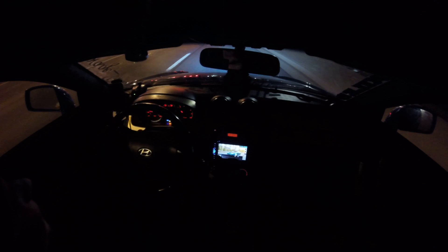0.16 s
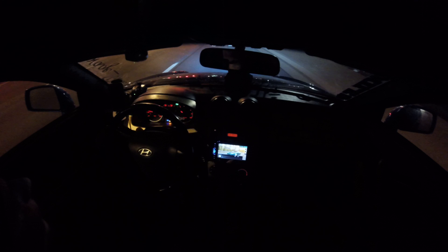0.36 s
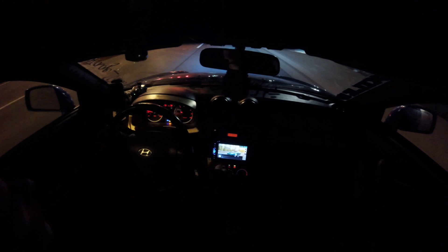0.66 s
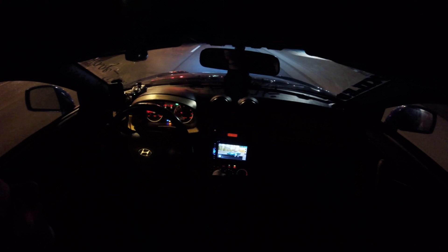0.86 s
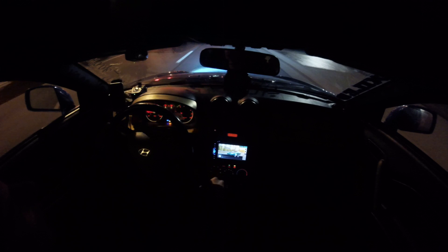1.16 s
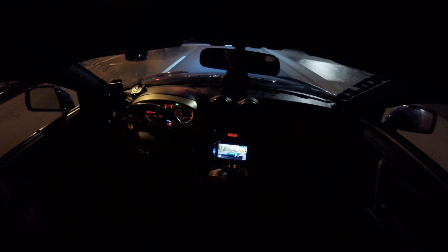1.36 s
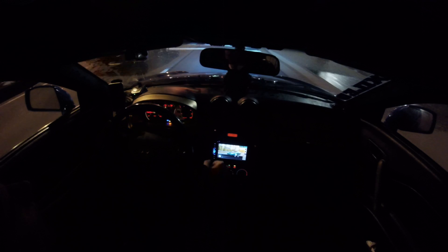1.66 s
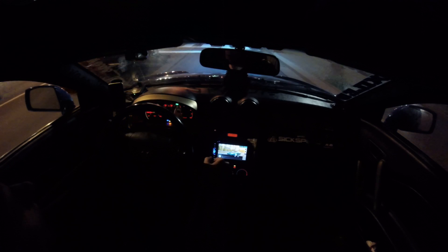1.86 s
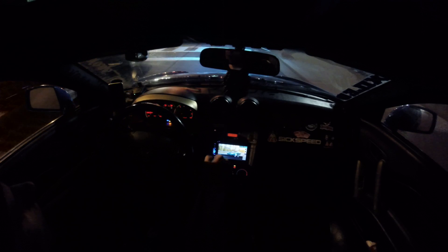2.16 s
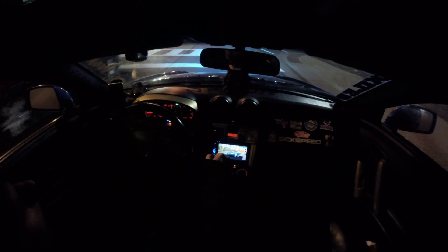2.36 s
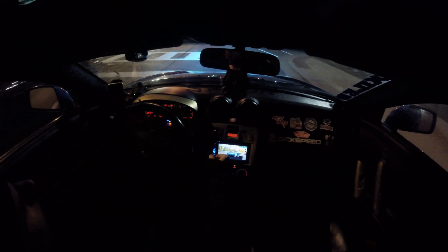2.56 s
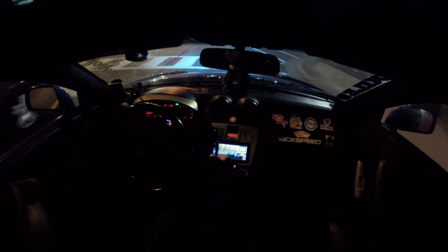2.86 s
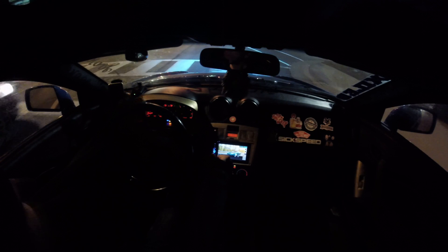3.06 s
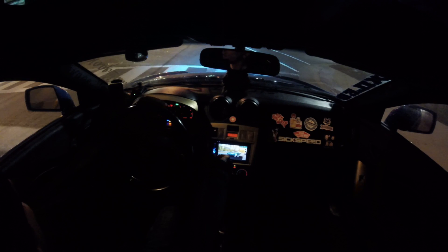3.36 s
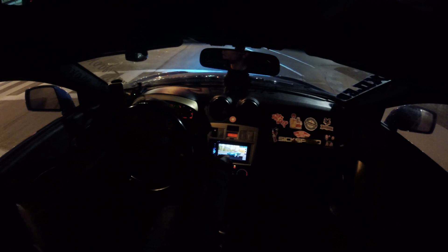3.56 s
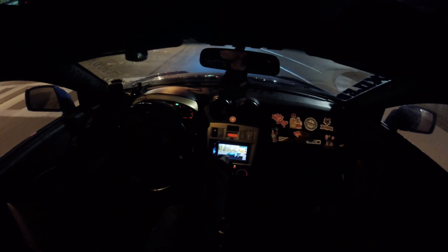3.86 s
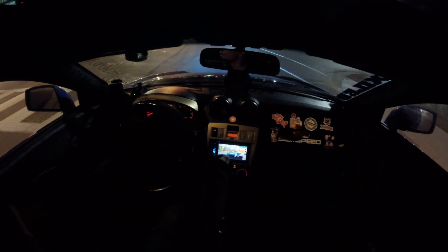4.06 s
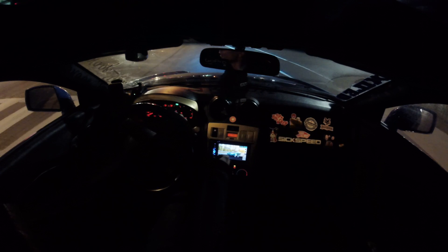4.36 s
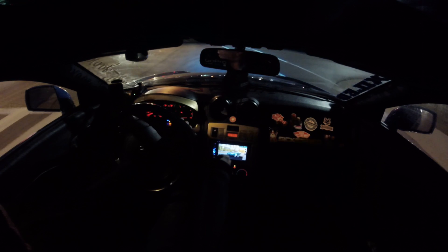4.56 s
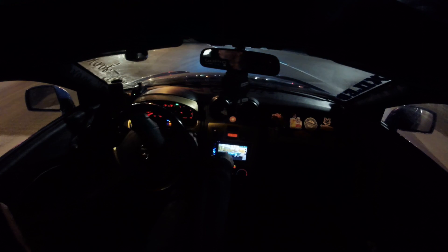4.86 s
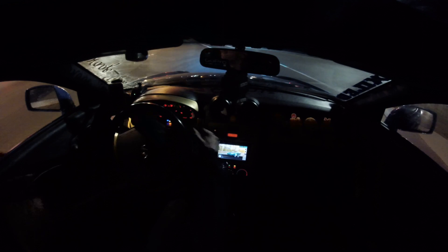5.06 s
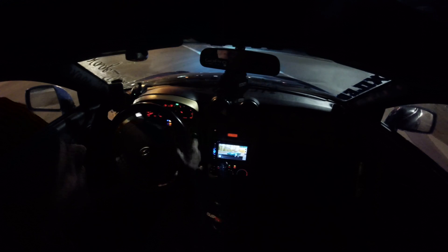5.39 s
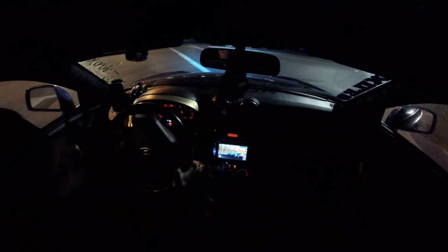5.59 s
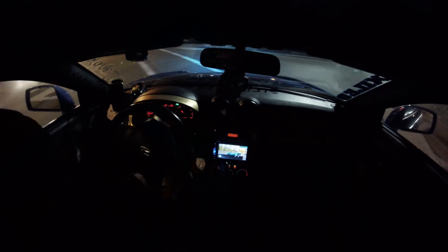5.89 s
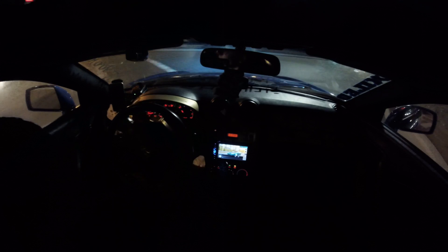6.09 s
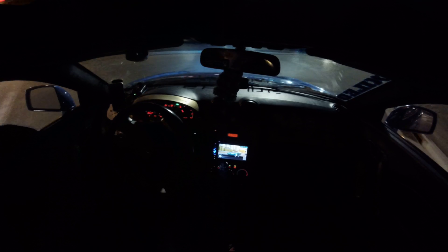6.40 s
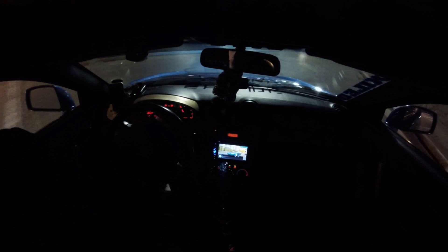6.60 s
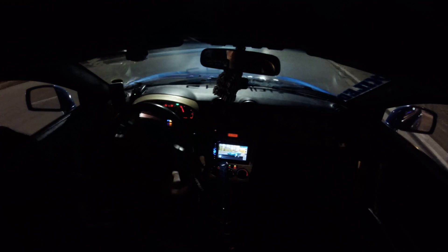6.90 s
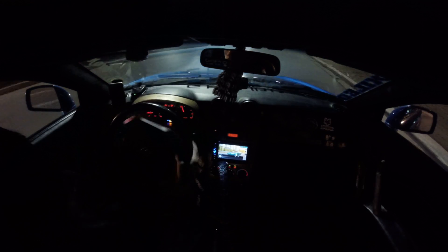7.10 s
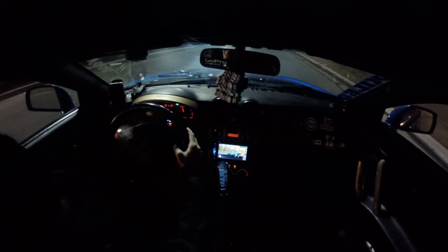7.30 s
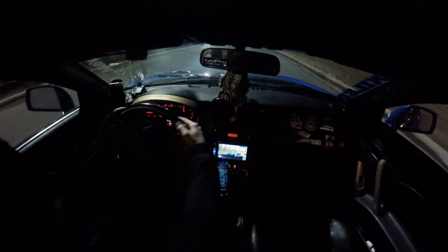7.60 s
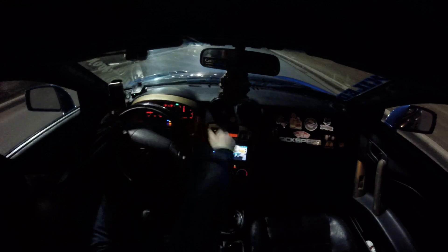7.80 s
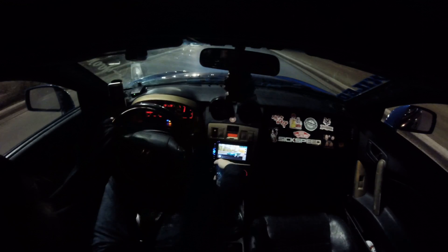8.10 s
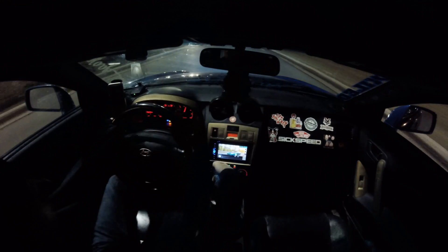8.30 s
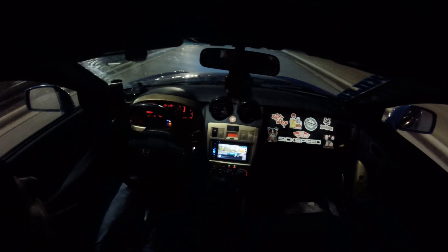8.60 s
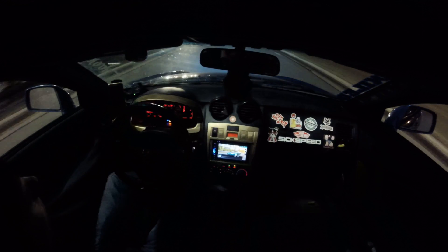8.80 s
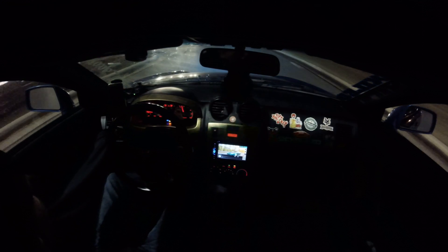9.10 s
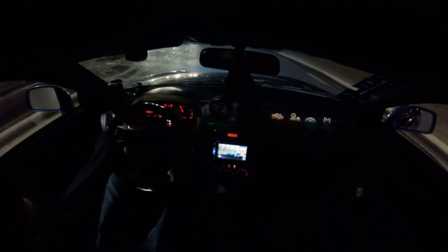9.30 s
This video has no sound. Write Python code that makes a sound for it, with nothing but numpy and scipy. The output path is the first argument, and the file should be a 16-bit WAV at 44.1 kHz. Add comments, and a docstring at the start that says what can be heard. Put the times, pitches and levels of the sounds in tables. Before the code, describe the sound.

Cabin microphone, close and boomy: open exhaust note sinks as the car slows for a turn, popping and grumbling into an uneven idle while an indicator clicks. After about four seconds a rough throttle blip breaks in, then a long rising pull swells into a hard raspy blare. It drops for a gear change and surges again, over road rumble, small rattles and growing air hiss.

```python
"""A four-cylinder engine with an open exhaust burbles down to idle, heard from the cabin on a night road.
An indicator ticks for the turn; the engine is blipped into gear, pulls hard, lifts for a shift, pulls again.
Harmonics of the firing rate make its boom and rasp; ringing firings make the burble, damped sines the pops.
Filtered noise makes gas rush, body rumble, tyres and wind; enveloped resonances make trim knocks and clinks.
Short scrapes and faint gliding tones come and go."""
import sys
import numpy as np
from scipy import signal
from scipy.fft import rfft, irfft, next_fast_len
from scipy.io import wavfile

SR = 44100
rng = np.random.default_rng(int(sys.argv[2]) if len(sys.argv) > 2 else 0)


def persist_wave(psi):
    """Save psi, clipped to +-1, as 16-bit WAV."""
    counts = np.round(np.clip(psi, -1, 1) * 32767).astype(np.int16)
    wavfile.write(sys.argv[1], SR, np.atleast_2d(counts).T)


N = 416736
TIME = np.arange(N) / SR


def from_db(db):
    """Amplitude gain is ten to the power of decibels over twenty."""
    return 10 ** (np.asarray(db) / 20)


def rms_one(x):
    """Normalisation: scale to unit mean power."""
    return x / np.sqrt(np.mean(x ** 2) + 1e-20)


def in_time(rows):
    """Linear interpolation: each column of a curve at every sample."""
    s, *columns = np.transpose(rows)
    return [np.interp(TIME, s, c) for c in columns]


def at_hz(points, hz):
    """Interpolate a spectrum's level in dB on a log-frequency axis."""
    f, level = np.transpose(points)
    return np.interp(np.log(hz + 1e-9), np.log(f), level)


def humps(rows, hz):
    """Resonance curves: level in dB of narrow peaks or notches at a moving frequency."""
    return sum(db / (1 + ((hz - centre) / half_width) ** 2) for centre, half_width, db in rows)


def drift(rate_hz, step=40):
    """Slow random modulation: low-passed noise with a spread of one, drawn every few samples."""
    r = np.exp(-2 * np.pi * step * rate_hz / SR)
    draws = rng.standard_normal(N // step + 2002)
    slow = signal.lfilter([1], [1, -2 * r, r * r], draws)[2000:]   # the filter has settled
    return np.interp(np.arange(N) / step, np.arange(len(slow)), rms_one(slow))


def noise(spectrum):
    """Spectral shaping: unit noise of a given colour that falls away steeply beyond its ends."""
    size = next_fast_len(N)
    hz = np.arange(size // 2 + 1) * SR / size + 1e-3
    low_end = 1 / (1 + (spectrum[0][0] / hz) ** 6)
    high_end = 1 / (1 + (hz / spectrum[-1][0]) ** 6)
    white = rfft(rng.standard_normal(size))
    return rms_one(irfft(white * from_db(at_hz(spectrum, hz)) * low_end * high_end, size)[:N])


def resonate(x, hz, width_hz):
    """Damped resonance: a two-pole filter with unit gain at its top."""
    r = np.exp(-np.pi * width_hz / SR)
    zeros = np.array([1, 0, -1]) * (1 - r * r) / 2
    poles = [1, -2 * r * np.cos(2 * np.pi * hz / SR), r * r]
    return signal.lfilter(zeros, poles, x + 1e-18)


def decay(t60, rise_s, size=13000):
    """Impact envelope: a quick rise, then an exponential fall of 60 dB in t60 seconds."""
    t = np.arange(size) / SR
    return (1 - np.exp(-t / rise_s)) * np.exp(-np.log(1000) * t / t60)


def add(out, s, sound):
    """Superposition: mix a sound in at a given time."""
    at = max(round(s * SR), 0)
    out[at:at + len(sound)] += sound[:max(N - at, 0)]


# engine speed: time_s, firing_rate_hz
FIRING = [(0, 124.6), (.2, 120.4), (.45, 112.2), (.9, 84), (1.4, 44), (1.9, 32), (4.12, 31), (4.37, 91),
          (4.65, 97.5), (5.12, 79.5), (5.3, 95.2), (5.45, 100.8), (5.9, 124.4), (6.45, 146.4), (7.5, 181.9),
          (8.1, 213), (8.42, 234.8), (8.5, 223), (8.85, 208.8), (9.06, 192.5), (9.21, 162), (9.45, 157.3)]


def crankshaft():
    """Phase is the integral of frequency: firing rate, and firings counted with a little unsteadiness."""
    firing_hz, = in_time(FIRING)
    turns = np.cumsum(firing_hz * (1 + 0.0023 * drift(25.6))) / SR
    return firing_hz, turns


REFERENCE_HZ = 220   # firing rate to which engine levels refer
# throttle shut: levels at the reference speed, falling as the engine slows
SHUT_TONE_DB, SHUT_OCTAVE_DB, SHUT_RASP_DB, SHUT_DB_PER_OCTAVE = -12, -20, -41, 3.5
# burble at idle, and its swell while the revs fall through the overrun range
IDLE_BURBLE_DB, OVERRUN_DB, OVERRUN_HZ, OVERRUN_OCTAVES = -35, 12, 57, 0.78
SETTLE_DB_PER_S = 5.5   # the burble calms only slowly
RASP_DB_PER_OCTAVE = 5   # under load the rasp hardens as the revs climb
RELEASE_S = 0.066   # the throttle snaps shut
BITE_DB, BITE_S = 7, 0.26   # rasp and burble flare as it opens, then settle
# presses of the throttle: start_s, end_s, attack_s, tone_db, octave_db,
# rasp_db (at the reference speed, before the flare), burble_db (before the flare)
PRESSES = [(-.1, 0.568, 0.044, -3.5, -15.5, -40, -32.5), (0.506, 0.704, 0.088, -7.5, -18.5, -27.5, -34.5),
           (4.168, 4.448, 0.059, -2.5, -8.5, -26, -26), (4.497, 5.19, 0.016, -5, -13.5, -23, -33),
           (5.145, 8.407, .08, -1.68, -9.5, -25.5, -37), (9.041, 9.5, 0.22, 0.5, 1, -26, -38.5)]


def throttle(firing_hz):
    """Load sets source strength: dB of tone, octave, rasp and burble, moved by each press from shut values."""
    octaves = np.log2(firing_hz / REFERENCE_HZ)
    slowing = SHUT_DB_PER_OCTAVE * octaves
    revving = RASP_DB_PER_OCTAVE * octaves
    overrun = OVERRUN_DB * np.exp(-(np.log2(firing_hz / OVERRUN_HZ) / OVERRUN_OCTAVES) ** 2)
    # limit how fast the swell may fall
    overrun = np.maximum.accumulate(overrun + SETTLE_DB_PER_S * TIME) - SETTLE_DB_PER_S * TIME
    levels = [SHUT_TONE_DB + slowing, SHUT_OCTAVE_DB + slowing, SHUT_RASP_DB + slowing,
              IDLE_BURBLE_DB + overrun]
    for start, end, attack, tone_db, octave_db, rasp_db, burble_db in PRESSES:
        pressing = (TIME - start) / attack
        releasing = 1 - (TIME - end) / RELEASE_S
        opening = np.clip(np.minimum(pressing, releasing), 0, 1)
        bite = BITE_DB * np.exp(-np.abs(TIME - start - attack) / BITE_S)
        targets = (tone_db, octave_db, rasp_db + revving + bite, burble_db + bite)
        levels = [now + opening * (pressed - now) for now, pressed in zip(levels, targets)]
    return levels


CRANK_DB, CRANK_DB_PER_OCTAVE = -13.5, 23.5   # tone at half the firing rate, at the reference speed
# how strongly the exhaust's low orders reach the seat: frequency_hz, level_db
BOOM = [(30, -47.5), (50, -32), (75, -14), (95, -6), (115, -7), (125, -10.5), (140, -8), (225, -9),
        (295, -14), (348, -5.5), (430, -13), (470, -16.5)]
# cancellations in the cabin that those orders sweep through: centre_hz, half_width_hz, depth_db
NULLS = [(164.3, 4.5, -7), (195.5, 4, -9), (322.5, 5, -16), (388.6, 2.6, -16.5)]
# brief dips of the firing tone: centre_s, width_s, depth_db
DIPS = [(4.487, .018, -14), (8.168, .03, -12)]


def boom(turns, firing_hz, tone_db, octave_db, fifth_db=-21):
    """Order synthesis: low harmonics sweep the cabin response; unequal cylinders add crank orders 1 and 3."""
    def order(multiple, db):
        """A harmonic of the firing rate, weighted by the transfer path."""
        hz = multiple * firing_hz
        path_db = at_hz(BOOM, hz) + humps(NULLS, hz)
        return np.sqrt(2) * from_db(db + path_db) * np.sin(2 * np.pi * multiple * turns)
    dip = sum(db * np.exp(-((TIME - s) / width) ** 2) for s, width, db in DIPS)
    crank_db = CRANK_DB + CRANK_DB_PER_OCTAVE * np.log2(firing_hz / REFERENCE_HZ)
    uneven_db = 2.2 * drift(5.2)
    firing = order(1, tone_db + dip - 0.27 * drift(37))
    octave = order(2, octave_db + 1.5 * drift(29))
    crank = order(.5, crank_db + uneven_db)
    third_crank = order(1.5, tone_db + fifth_db + uneven_db)
    return firing + octave + crank + third_crank


# colour of the rasp through pipe and cabin: frequency_hz, level_db
PIPE = [(100, -4.5), (200, 8), (300, 3), (370, -1.5), (450, -5.5), (540, -4), (640, -5.5), (730, -9.5),
        (840, -21), (980, -18), (1150, -13.5), (1400, -18.5), (2200, -19)]
# cabin resonances that the higher orders sweep through: centre_hz, half_width_hz, level_db
BLARE = [(535, 30, 4), (790, 20, 3), (900, 26, 15)]


def rasp(turns, firing_hz, load_db, between_db=-14.5, imbalance_db_per_octave=9.0, tilt_db_per_octave=-12.5,
         echo=0.41, echo_top_hz=700, notch_hz=99.5):
    """Comb filtering: higher crank orders in the pipe's colour, notched by a dull echo from its open end."""
    out = np.zeros(N)
    # cylinders differ more at high revs, which lifts the orders between the firing harmonics
    between = between_db + imbalance_db_per_octave * np.log2(firing_hz / firing_hz[0])
    for k in range(5, 23):   # crank orders, two per firing harmonic
        hz = firing_hz * k / 2
        octaves_above_third = max(np.log2(k / 6), 0)
        level = at_hz(PIPE, hz) + humps(BLARE, hz) + tilt_db_per_octave * octaves_above_third
        level += between * (k % 2)
        level += 1.5 * drift(10) + 2.6 * drift(2.4)   # roughness and slow swell
        angle = np.pi * k * turns + 2 * np.pi * rng.random()
        reflected = echo / (1 + (hz / echo_top_hz) ** 4)
        delayed = np.cos(angle - 2 * np.pi * hz / notch_hz)
        out += from_db(level) * (np.cos(angle) - reflected * delayed)
    return from_db(load_db) * out


# standing waves of pipe and cabin that single firings set ringing: frequency_hz, width_hz, level_db
PIPE_MODES = [(68, 24, 2), (106, 17.3, 8), (133.2, 13, 4), (213.4, 20, 0), (252, 30, -6), (376, 39, -13.5),
              (397, 220, -23), (554, 76, -27)]


def burble(turns, level_db, uneven_db=4.0, scatter=.1):
    """Impulse excitation of modes: weak firings of uneven strength and timing each ring in the pipe."""
    at = np.flatnonzero(np.diff(np.floor(turns)) > 0)
    timing, strength = rng.standard_normal((2, len(at)))
    period = np.gradient(at)
    late = (scatter * period * timing).astype(int)
    puffs = np.zeros(N)
    gains = from_db(uneven_db * np.clip(strength, -2, 1))
    puffs[np.clip(at + late, 0, N - 1)] = gains * np.sqrt(period)   # even power at any firing rate
    rings = np.zeros(N)
    for k, (hz, width, db) in enumerate(PIPE_MODES):
        rings += (-1) ** k * from_db(db) * resonate(puffs, hz, width)
    muffled = signal.sosfilt(signal.butter(2, [60, 750], "band", fs=SR, output="sos"), rings)
    return from_db(level_db) * rms_one(muffled)


# pops in the exhaust on the overrun: start_s, relative_level_db, pipe_resonance_hz
POPS = [(0.843, -21.5, 354), (.89, -21.5, 406), (0.962, -14.5, 100), (1.045, -11, 92), (1.314, -13, 115.5)]


def pops(t60=0.13):
    """Free decay of a resonator: unburnt fuel goes off in the pipe and sets it ringing."""
    out = np.zeros(N)
    for s, db, hz in POPS:
        envelope = decay(t60, rise_s=0.0048)
        add(out, s, from_db(db) * 2 * envelope * np.sin(2 * np.pi * hz * TIME[:len(envelope)]))
    return out


# rush of gas through the engine: frequency_hz, density_db (per Hz)
RUSH = [(500, -3.5), (1000, 1.5), (1600, 1), (2200, -5.5), (3200, -7.5), (4200, -20), (7000, -27)]


def rush(turns, firing_hz, top_db=-55.0, per_octave_db=17.5):
    """Flow noise, amplitude-modulated: a gust with each firing that grows steeply with engine speed."""
    level = top_db + per_octave_db * np.log2(firing_hz / firing_hz.max())
    gusts = 1 + np.cos(2 * np.pi * turns)
    return from_db(level) * gusts * noise(RUSH)


# knocks of plastic trim and levers: start_s, relative_level_db, centre_hz, t60_s
KNOCKS = [(.609, -42, 3500, 0.073), (.66, -49, 4500, .12), (.692, -47, 4500, 0.15), (.725, -48, 5000, .08),
          (1.767, -45, 3800, .15), (1.785, -38, 800, .11), (1.864, -49, 5000, 0.14),
          (2.029, -34, 1080, 0.088), (2.295, -34, 706, 0.12), (2.838, -41, 1150, 0.078),
          (3.002, -31, 620, 0.07), (4.327, -34.5, 1900, 0.11), (4.332, -41.5, 5500, 0.1),
          (4.407, -31.5, 1600, 0.09), (4.409, -42, 3780, .11), (6.168, -41.5, 4300, 0.057),
          (6.224, -48.5, 3940, 0.087), (6.292, -49, 4500, .06), (7.308, -44.5, 4500, 0.068),
          (7.843, -42, 4500, .06), (7.885, -41.5, 5500, .1), (7.906, -40, 4000, 0.16),
          (8.003, -43, 4500, 0.05), (8.096, -40.5, 4500, 0.075), (8.118, -32, 2050, .13),
          (8.542, -42.5, 4500, .06)]


def knocks(level_db=-4.0, top_hz=7000):
    """Impact on damped panels: a short chatter of contacts in a broad cluster of modes."""
    out, chatter = np.zeros(N), rms_one(from_db(3 * drift(200)))
    for s, db, hz, t60 in KNOCKS:
        envelope = decay(t60, rise_s=.0015)
        contacts = rng.standard_normal(len(envelope))
        cluster = resonate(resonate(contacts, hz, hz * hz / (hz + 2500)), hz, 2 * hz)
        dull = signal.butter(2, 2 * hz, fs=SR, output="sos")
        add(out, s, from_db(db + level_db) * envelope * rms_one(signal.sosfilt(dull, cluster)))
    return signal.sosfilt(signal.butter(3, top_hz, fs=SR, output="sos"), out * chatter)


# short scrapes during the gear change: start_s, relative_level_db, centre_hz, t60_s
SCRAPES = [(8.78, -44, 1550, 0.12), (9.037, -44.5, 1780, 0.12), (9.073, -37, 1710, 0.049)]


def scrapes(width_hz=600):
    """Friction as random excitation: something rubs briefly and sounds one broad resonance."""
    out = np.zeros(N)
    for s, db, hz, t60 in SCRAPES:
        envelope = decay(t60, rise_s=.005)
        rub = resonate(resonate(rng.standard_normal(len(envelope)), hz, width_hz), hz, width_hz)
        add(out, s, from_db(db) * 2 * envelope * rms_one(rub))
    return out


# small metal pieces swinging together: start_s, relative_level_db, brightness_db_per_octave
CLINKS = [(5.012, -27.5, 0.5), (5.045, -38, -4), (5.566, -36, 1), (5.601, -32.5, 6.5), (8.6, -47, 15)]
# modes of their ring: frequency_hz, level_db, t60_s
METAL = [(2590, -1.5, 0.094), (3300, -11.5, 0.12), (3960, 1, 0.09), (4670, -5.5, 0.027), (4880, -1, 0.09),
         (5600, -6.5, 0.047), (6300, -12.5, 0.16), (7100, -13, .07), (9450, -19, .11), (10960, -23.5, .07),
         (15200, -33, .06)]


def clinks(level_db=-6.0, blur_hz=260):
    """Modal decay: metal touches metal; chatter and cabin reflections blur every mode."""
    out = np.zeros(N)
    for s, db, brightness in CLINKS:
        ring, power = 0, 0
        for hz, mode_db, t60 in METAL:
            envelope = decay(t60, rise_s=0.0016)
            gain = from_db(mode_db + brightness * np.log2(hz / METAL[0][0]))
            chatter = rng.standard_normal(len(envelope))
            mode = resonate(resonate(chatter, hz, blur_hz), hz, hz / 2)
            ring = ring + gain * envelope * rms_one(mode)
            power += gain ** 2
        add(out, s, from_db(db + level_db) * ring / np.sqrt(power))
    return out


RELAY_START_S, RELAY_PERIOD_S, RELAY_TICKS = .4495, .5004, 15
RELAY_DB, RELAY_FADE_DB_PER_S = -49, -0.75   # level at time zero, and its slow fading
# colour of the tick: frequency_hz, density_db (per Hz)
RELAY_COLOUR = [(2000, -18), (3300, 0), (4300, 1.5), (5400, 6.5), (6500, -8.5), (8000, -13), (12000, -31.5)]


def relay(t60=0.093):
    """Periodic impacts: the indicator ticks about twice a second as decaying bursts of coloured noise."""
    envelope = np.zeros(N)
    for s in RELAY_START_S + RELAY_PERIOD_S * np.arange(RELAY_TICKS):
        add(envelope, s, from_db(RELAY_DB + RELAY_FADE_DB_PER_S * s) * decay(t60, rise_s=0.0023))
    return envelope * noise(RELAY_COLOUR)


# faint wavering tones in the cabin: start_s, end_s, start_pitch_hz, end_pitch_hz (before wobble), peak_db
WAVERS = [(2.02, 2.105, 537, 544, -34), (2.118, 2.308, 579, 660, -39), (3.371, 3.686, 634, 603, -40.5),
          (6.001, 6.166, 591, 561, -29.5)]


def wavers(unsteady=0.0086):
    """Frequency modulation: short soft tones swell, glide unsteadily and fade."""
    out, wobble = np.zeros(N), 1 + unsteady * drift(27)
    for start, end, from_hz, to_hz, db in WAVERS:
        size = max(round((end - start) * SR), 2)
        hz = np.linspace(from_hz, to_hz, size) * wobble[:size]
        swell = np.sin(np.linspace(0, np.pi, size))
        add(out, start, from_db(db) * swell * np.sin(2 * np.pi * np.cumsum(hz) / SR))
    return out


RUMBLE_FOLLOWS, RUMBLE_DB = .7, -33   # share of the tyres' swing; body rumble at mean tyre level
JOLT_S = 0.15
# road speed, as the noise it makes: time_s, relative_tyre_roar_db, wind_hiss_db
ROAD = [(0, -28, -49.5), (.8, -31.5, -51), (1.6, -37, -52.5), (2.3, -39, -52.5), (2.6, -39.5, -53),
        (4.1, -36.5, -53), (4.4, -33.5, -52.5), (5.75, -36, -54.5), (6.6, -33, -55), (7.15, -29, -50.5),
        (8.2, -25.5, -49), (8.55, -29.5, -51), (9.0, -25.5, -49), (9.45, -25.5, -47.5)]
# jolts that shake the body: centre_s, level_db
JOLTS = [(.22, -26.5), (.68, -23), (1.04, -26.5), (1.42, -27.5), (1.8, -30), (2.05, -31), (2.28, -27.5),
         (2.75, -29.5), (3.02, -32.5), (3.55, -39), (4.38, -22.5), (4.87, -30), (7.16, -26), (8.9, -22)]
# cabin resonances that the road keeps humming: centre_hz, width_hz (of the sharper filter), level_db
CABIN = [(78, 4.3, -10.5), (120, 11, -8.5), (223.7, 15, -5.5), (253.6, 24, -4), (577.4, 28, -8.5)]
# spectra of body rumble, tyre roar and wind hiss: frequency_hz, density_db (per Hz)
RUMBLE = [(15, -13), (27, 5), (42, -6), (60, -9.5), (90, -18)]
TYRES = [(45, -18), (75, -0.5), (130, 0), (170, -4.5), (230, -6), (320, -8), (420, -5.5), (600, -12),
         (780, -20), (900, -25), (1100, -33.5), (1800, -33)]
HISS = [(600, 0.5), (1000, 6.5), (1600, 0), (2100, 3), (2450, -7), (3400, -6.5), (4800, -12), (6500, -13),
        (7200, -20.5), (8200, -19), (9200, -24.5), (11500, -26.5), (14500, -42)]


def road(turns, tyres_db=2.5, cabin_db=-5.0, pulsing=0.091, thump_db=-10):
    """Random excitation of body and cabin: jolted rumble, humming tyre roar, hiss pulsing with the firings."""
    tyres, hiss = in_time(ROAD)
    rumble = from_db(RUMBLE_DB + RUMBLE_FOLLOWS * (tyres - tyres.mean()) + 0.5 * drift(3))
    jolts = sum(from_db(db) * np.exp(-((TIME - s) / JOLT_S) ** 2) for s, db in JOLTS)
    roar = np.hypot(from_db(tyres + drift(18)), from_db(thump_db) * jolts)   # powers add
    hum = np.zeros(N)
    for hz, width, db in CABIN:
        mode = resonate(resonate(rng.standard_normal(N), hz, width), hz, 4 * width)
        hum += from_db(db) * rms_one(mode)
    body = np.hypot(rumble, jolts) * noise(RUMBLE)
    rolling = roar * (from_db(tyres_db) * noise(TYRES) + from_db(cabin_db) * hum)
    pulse = 1 + pulsing * np.cos(2 * np.pi * turns)
    wind = from_db(hiss + .5 * drift(13)) * pulse * noise(HISS)
    return body + rolling + wind


def scene():
    """Superposition of sources: one crankshaft and one throttle drive the engine layers."""
    firing_hz, turns = crankshaft()
    tone_db, octave_db, rasp_db, burble_db = throttle(firing_hz)
    engine = boom(turns, firing_hz, tone_db, octave_db) + rasp(turns, firing_hz, rasp_db)
    engine += burble(turns, burble_db) + pops() + rush(turns, firing_hz)
    loose = knocks() + scrapes() + clinks()
    return (engine + loose + relay() + wavers() + road(turns))[None]


CUTOFF_HZ = 15700


def record(dry):
    """Band limiting: the sound opens and closes without a click; the top is cut steeply."""
    edges = np.clip(np.minimum(TIME, TIME[-1] - TIME) / .003, 0, 1)
    steep = signal.cheby2(12, 70, CUTOFF_HZ + 900, fs=SR, output="sos")   # stopband edge
    return signal.sosfilt(steep, dry * edges)


dry = scene()
out = record(dry)
persist_wave(out)
```